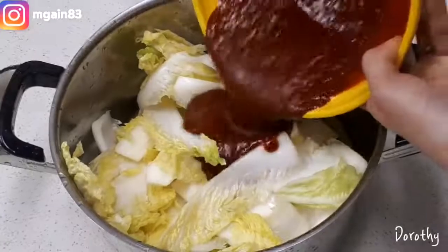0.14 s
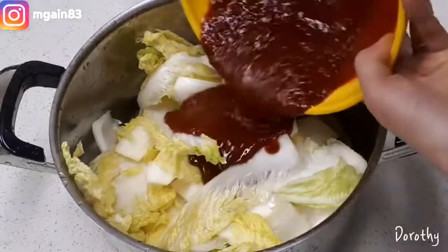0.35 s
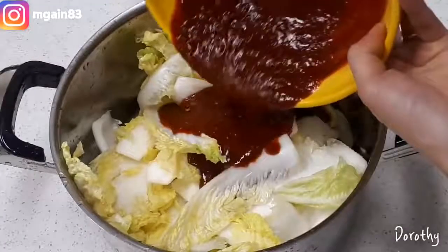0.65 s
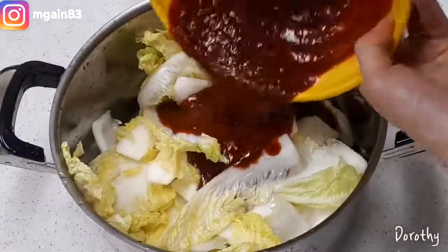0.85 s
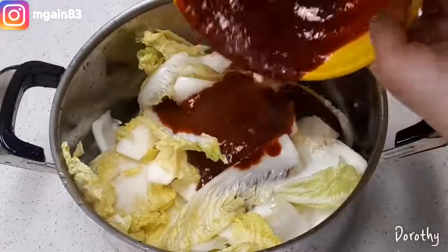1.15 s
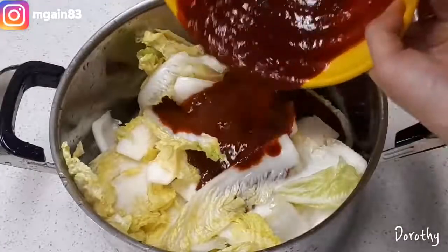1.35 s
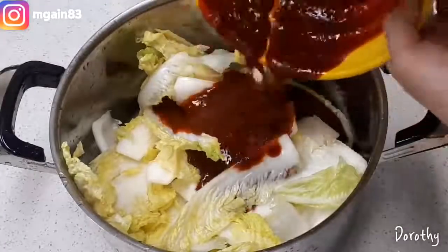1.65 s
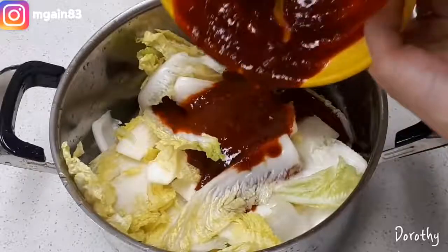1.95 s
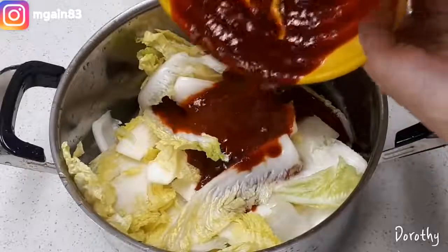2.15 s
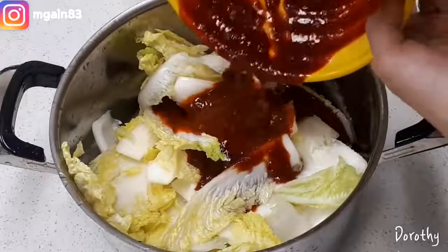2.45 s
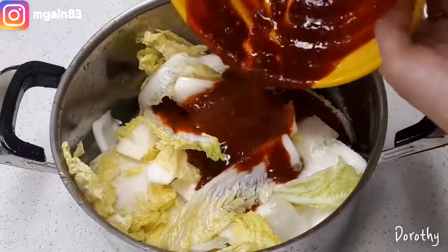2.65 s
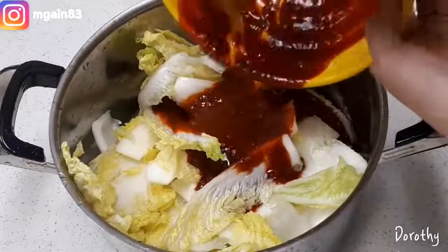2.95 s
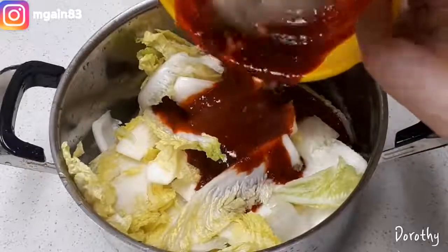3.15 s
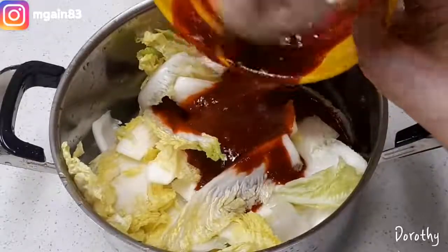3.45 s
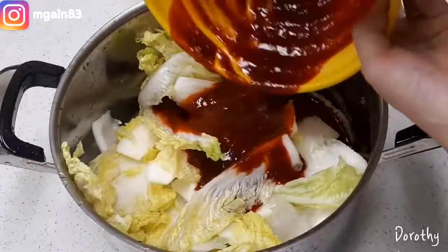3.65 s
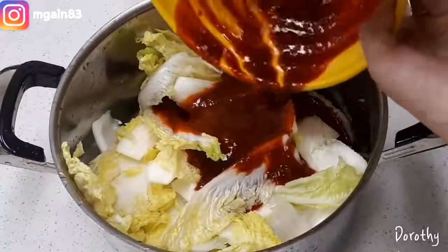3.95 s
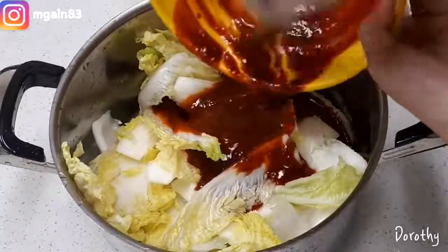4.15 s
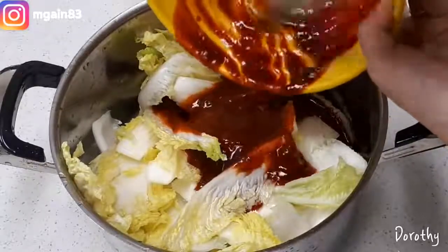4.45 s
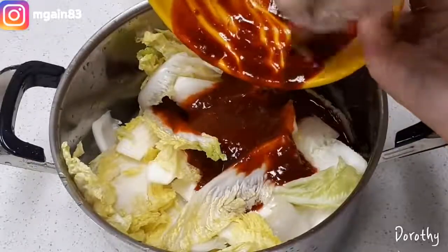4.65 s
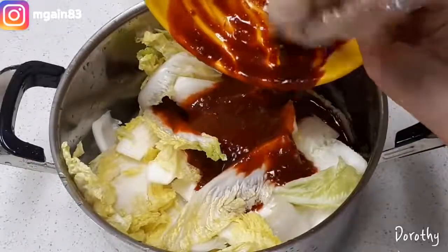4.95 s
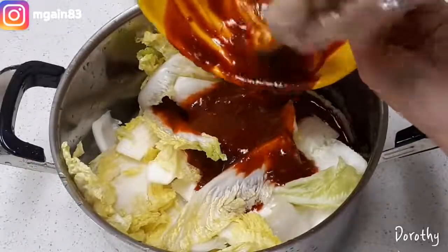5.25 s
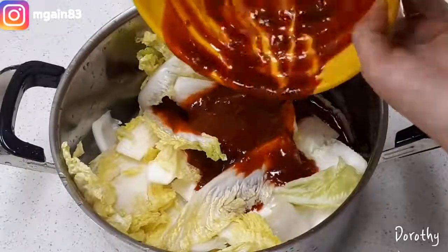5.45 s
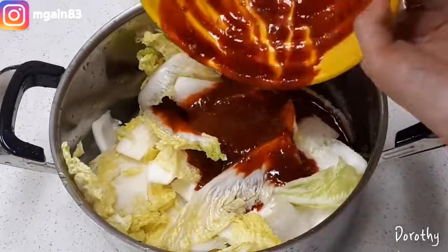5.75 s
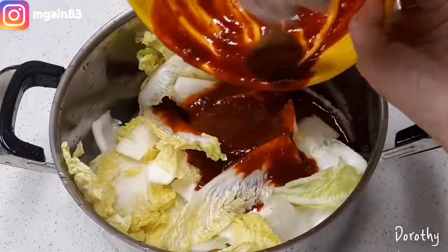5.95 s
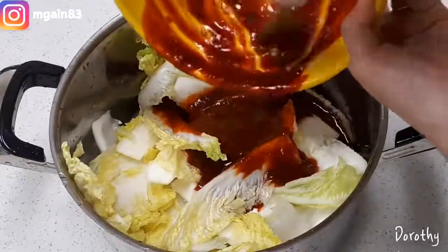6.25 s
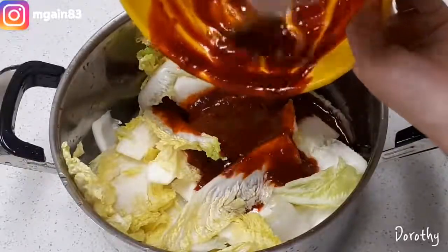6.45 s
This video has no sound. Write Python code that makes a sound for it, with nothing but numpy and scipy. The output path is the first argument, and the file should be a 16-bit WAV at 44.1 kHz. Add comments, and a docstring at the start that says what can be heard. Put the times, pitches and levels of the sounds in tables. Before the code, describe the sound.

Close, dry-ish kitchen sound: soft ventilation with a faint appliance hum, then short wet wipes of sauce under a gloved hand. Plastic bowl knocks are hollow and quickly damped, several in quick pairs mid-way, later spaced about a quarter second apart. Glove film clicks, one bright and much louder early on, and small squirts of trapped air accompany the strokes. Near echoes and a short tail.

```python
"""Gloved hand scraping thick sauce from a plastic bowl.

Strokes squelch: bursting films and bubbles, filtered by shifting pockets between the fingers.
Wet knocks, many of them at the start of a stroke, flex the bowl and ring its modes; air squirts out.
The thin glove snaps in between: short coloured noise clicks.
Kitchen: near echoes and a short diffuse tail, over ventilation noise and a faint appliance hum."""
import sys
import numpy as np
from scipy import signal
from scipy.io import wavfile
from scipy.ndimage import uniform_filter1d

SR = 44100
rng = np.random.default_rng(int(sys.argv[2]) if len(sys.argv) > 2 else 0)


def wav_record(signal):
    """Record a signal, one row per channel, as 16-bit PCM in the file named by sys.argv[1]."""
    frames = np.transpose(np.atleast_2d(signal))
    bounded = np.clip(frames, -1, 1)
    # unit amplitude maps onto the largest positive 16-bit level
    quanta = np.round(bounded * 32767).astype(np.int16)
    wavfile.write(sys.argv[1], SR, quanta)


N = 290619

# ventilation noise spectrum: f/Hz, relative level/dB
AIR_SPECTRUM = [(20, -29), (45, -14), (75, -11), (130, -1), (200, -8.5), (420, -13.5), (600, -14.5),
                (780, -13.5), (1000, -23.5), (2000, -27), (4000, -40), (7800, -31.5), (9000, -40),
                (13000, -39.5)]
# appliance hum partials: f/Hz, rms level/dB before the opening rise
HUM_PARTIALS = [(75, -72.5), (120, -67), (420, -72), (753, -69)]
# kitchen decay: f/Hz, t60/s
KITCHEN_T60 = [(150, 0.86), (500, 0.55), (1400, 0.39), (4000, 0.44), (10000, 0.4)]
# echoes from pot, counter and wall: t/s, gain/1
ECHOES = [(.0021, 0.006), (.0052, 0.18), (.0093, 0.0081), (0.0142, .16), (0.0324, 0.2)]
# side filter, stereo width: f/Hz, gain/dB
WIDTH = [(100, -13.5), (350, -14.5), (700, -9.5), (1400, -5.5), (2800, -7.5), (5500, -1.5), (12000, -4)]
# clearest snaps of glove and popping sauce: t/s, peak level/dB, tilt/(dB/octave)
SNAPS = [(0.124, -33, 14), (.652, -38, 7), (0.787, -33, 12), (0.815, -32, 1.5), (.829, -33.5, 0.5),
         (0.941, -32, -6), (.963, -28, -0.5), (1.0766, -11, 16.5), (1.138, -28.5, 10), (1.379, -34, 6),
         (1.821, -22, 9.5), (1.833, -27, 6), (2.14, -40, 7), (2.235, -36, 6), (3.254, -31, 2),
         (3.566, -33.5, -4.5), (3.649, -34.5, -5), (4.559, -34, -4), (4.932, -45, 1.5), (5.107, -35.5, -2),
         (5.208, -39.5, -7), (5.938, -36.5, -7), (6.024, -31.5, -1), (6.187, -37.5, 0.5),
         (6.229, -38.5, -2.5), (6.26, -30, 8.5), (6.366, -31.5, -1), (6.442, -37, -1.5)]
# snap spectrum: f/Hz, relative level/dB
SNAP_SPECTRUM = [(300, -19), (1200, -9.5), (3200, 4.5), (7500, 6), (9000, -1), (13000, -4)]
# squirts from pockets under the fingers: t/s, level/dB, f/Hz, bandwidth/Hz, decay/s
SQUIRTS = [(0.552, -50.5, 2560, 400, 0.052), (1.035, -51, 3000, 900, 0.046),
           (1.475, -44.5, 3160, 400, 0.023), (1.642, -31.5, 3300, 700, 0.0062),
           (1.674, -34.5, 1410, 1090, 0.014), (1.991, -36, 2970, 4020, .011),
           (2.388, -35, 4300, 1310, 0.008), (2.6, -56.5, 4130, 900, 0.13), (2.712, -41, 2550, 905, 0.042),
           (3.028, -31, 3230, 1820, 0.0096), (4.196, -51, 4100, 900, 0.041), (4.715, -40, 3250, 346, 0.022),
           (4.829, -45, 1210, 890, .008), (5.135, -41, 3190, 400, 0.0042), (5.692, -52.5, 1830, 1000, .025),
           (5.83, -48.5, 3260, 600, 0.048), (6.311, -53.5, 3240, 450, 0.05)]
# knocks of hand and bowl: t/s, blow level/dB, blow f/Hz, smack level/dB,
# ring level re blow/dB (before RING_TRIM_DB)
KNOCKS = [(0.552, -35, 1310, -44.5, -8), (1.4747, -29, 696, -38.5, -5.5), (1.6453, -20.5, 910, -42, -14),
          (1.6726, -32, 1400, -52, -3), (1.9482, -31.5, 710, -38.5, -9.5), (2.221, -27.5, 656, -46, -4.5),
          (2.3657, -22, 1010, -34, -9), (2.3939, -19, 1700, -57, -27), (2.5651, -30, 690, -39, -7),
          (2.7128, -18.5, 1370, -35.5, -18.5), (2.8882, -33, 500, -47.5, -13),
          (3.025, -17, 1350, -32.5, -17.5), (3.2105, -32, 482, -52, -11), (3.3206, -17.5, 1160, -33.5, -12),
          (3.875, -30.5, 595, -42.5, -7), (3.9101, -26.5, 630, -45, -31), (3.935, -31.5, 870, -46.5, -17),
          (4.164, -18, 760, -38, -6.5), (4.438, -17.5, 834, -37.5, -10), (4.714, -17.5, 803, -47.5, -8),
          (5.0027, -19.5, 646, -50.5, -9.5), (5.3456, -23, 704, -49.5, -8), (5.6872, -34, 850, -38.5, -1),
          (6.3102, -25.5, 706, -41, -10)]
# bowl modes: f/Hz, relative level/dB, t60/s
BOWL_MODES = [(245.4, -21, 0.31), (373.5, -14, 0.32), (416.5, -9, 0.047), (544, -61, 0.12),
              (589, -24, 0.085), (615, -2.5, 0.062), (700, -21, 0.6), (747.3, -4.5, 0.05),
              (803.3, -4.5, 0.16), (1020, -41, 0.27), (1170, -48, .16), (1253, -13.5, 0.14),
              (1536, -21.5, 0.16), (1654, -22, 0.15), (2100, -44, 0.13), (3180, -20, 0.29),
              (3210, -6.5, 0.052), (3270, -47, 0.036), (4040, -18, 0.12)]
# wet smack spectrum: f/Hz, relative level/dB
SMACK_SPECTRUM = [(300, 5.5), (1000, 3), (1800, 8), (2600, -5), (3250, 7.5), (3600, -3.5), (4100, 3.5),
                  (5500, 1.5), (7800, -4.5), (8800, -11.5), (13000, -13.5)]
# strokes through the sauce: start t/s, length/s, level halfway/dB (before RUB_TRIM_DB),
# pressure growth over the stroke/dB, tilt/(dB/octave)
STROKES = [(0, 0.22, -71, -7, -4), (0.557, .09, -50.5, -2, -3), (0.75, 0.34, -54.5, 16.5, -2),
           (1.01, 0.32, -49, -1, 1.5), (1.247, .085, -39.5, 3.5, 0), (1.457, 0.21, -50.5, 1, -2),
           (1.602, 0.12, -42, -6.5, 0), (1.748, 0.231, -46, 7, 0), (1.973, 0.079, -41.5, -10, -2),
           (2.283, 0.091, -48, 11, -2.5), (2.6, 0.088, -54, 2, -1), (2.96, 0.049, -44.5, 7, -2),
           (3.108, 0.21, -50.5, 31.5, -2.5), (3.473, 0.12, -46.5, 3, -3), (3.882, 0.053, -43.5, 3, -1.5),
           (4.174, 0.057, -48.5, -1.5, -2), (4.444, 0.077, -44, -1.5, -2.5), (4.718, 0.14, -49.5, -13, -6),
           (4.997, 0.064, -47.5, -8, -3), (5.1, 0.14, -59, -16, -2), (5.353, 0.055, -47.5, 5.5, 0.5),
           (5.711, 0.29, -50, -1, 0), (6.034, 0.053, -42.5, 5, 0.5), (6.315, .11, -54, -6, 2.5),
           (6.464, 0.03, -51.5, 8, 3), (6.572, .03, -39.5, 8, -2)]
# squelch spectrum: f/Hz, relative level/dB
SQUELCH_SPECTRUM = [(100, 13), (220, -8.5), (420, 5.5), (800, 1.5), (1300, -3), (2100, 2), (2600, -4.5),
                    (3200, 1), (4200, 1.5), (5500, -2.5), (7800, -1), (8800, -9), (13000, -8)]

EDGE_HZ = 13150
RING_TRIM_DB, RUB_TRIM_DB = -3, -3
# all strokes grip and release alike; the sound dulls as the glove lifts
GRIP_S, RELEASE_S, DULLING_DB_PER_OCTAVE_S = 0.019, 0.021, 44
# faint steady noise floor under the strokes
FLOOR_DB = -81.5
# share of its pitch a pocket loses as it empties
SAG_SHARE = 0.059
# palm squirt: level re blow at PALM_HZ, rise with blow pitch, resonance
PALM_DB, PALM_DB_PER_OCTAVE = -22.5, 9
PALM_HZ, PALM_WIDTH_HZ, PALM_DECAY_S = 1280, 730, 0.022


def gain_of(db):
    """Decibels to amplitude."""
    return 10 ** (np.asarray(db) / 20)


def evened(x):
    """Scale to unit rms."""
    return x / np.sqrt(np.mean(x ** 2) + 1e-20)


def read(points, f_hz):
    """Interpolate a table over log frequency."""
    table_hz, value = np.transpose(points)
    return np.interp(np.log(f_hz + 1), np.log(table_hz), value)


def add(mix, t_s, sound):
    """Mix a sound in at a time, cut at the end of the mix."""
    part = mix[round(t_s * SR):][:len(sound)]
    part += sound[:len(part)]


def octaves(f_hz):
    """Octaves from 4200 Hz, the tilt pivot; constant below 1200 Hz."""
    return np.log2(np.maximum(f_hz, 1200) / 4200)


def colour(x, points, tilt_db=0, size=2048):
    """Causal minimum-phase filter with the given spectrum and tilt per octave."""
    f_hz = abs(np.fft.fftfreq(size, 1 / SR))
    log_gain = np.log(gain_of(read(points, f_hz) + tilt_db * octaves(f_hz)))
    taps = np.fft.ifft(np.exp(signal.hilbert(log_gain).conj())).real
    return signal.oaconvolve(x, taps[:size // 2])[:len(x)]


def low_cut(x, cut_hz):
    """Second-order high-pass."""
    return signal.sosfilt(signal.butter(2, cut_hz, "high", fs=SR, output="sos"), x)


def burst(t, decay_s):
    """Noise with instant onset and exponential decay."""
    return rng.standard_normal(len(t)) * np.exp(-t / decay_s)


def resonate(x, f_hz, width_hz):
    """Unit-gain one-pole resonance following the curve f_hz, by shift to 0 Hz and back."""
    turn = np.exp(2j * np.pi * np.cumsum(f_hz) / SR)
    r = np.exp(-np.pi * width_hz / SR)
    return 2 * (turn * signal.lfilter([1 - r], [1, -r], x / turn)).real


def background(air_db=-64, waver_rad=1.62, start_db=-5):
    """Ventilation noise and phase-wavering hum; both rise to full level from 0.5 to 1 s."""
    t = np.arange(N) / SR
    mid, side = (evened(colour(rng.standard_normal(N), AIR_SPECTRUM, size=8192)) * gain_of(air_db)
                 for _ in range(2))
    for f_hz, db in HUM_PARTIALS:
        waver = evened(signal.resample(rng.standard_normal(64), N))
        mid += gain_of(db) * np.sqrt(2) * np.sin(2 * np.pi * f_hz * t + waver_rad * waver)
    rise = gain_of(np.interp(t, [.5, 1], [start_db, 0]))
    return np.array([mid, colour(side, WIDTH)]) * rise


def tail(rise_s=0.002, reflections_per_s=4000):
    """Diffuse reflections: sparse noise taps, each band with its own decay; unit energy."""
    taps = rng.standard_normal(SR // 2) * (rng.random(SR // 2) < reflections_per_s / SR)
    f_hz, t, z = signal.stft(taps, SR, nperseg=256)
    decay = gain_of(-60 * t / read(KITCHEN_T60, f_hz)[:, None])
    z = z * decay * (1 - np.exp(-t / rise_s))
    taps = signal.istft(z)[1][:SR // 2]
    return taps / np.linalg.norm(taps)


def paths(room_db=-5, side_room_db=-1, scatter_db=-2, scatter_decay_s=0.0026):
    """Mid/side responses: direct sound, near echoes and room; early scatter in the side, mostly treble."""
    mid = gain_of(room_db) * tail()
    mid[0] += 1
    for t_s, gain in ECHOES:
        mid[round(t_s * SR)] += gain
    scatter = burst(np.arange(len(mid)) / SR, scatter_decay_s)
    scatter *= gain_of(scatter_db) / np.linalg.norm(scatter)
    side = colour(scatter + gain_of(side_room_db) * tail(), WIDTH)
    return np.array([mid, side])


def kitchen(x, count=4, tails_per_s=3.3):
    """Crossfade cyclically between several random tails, for a smooth, even room."""
    place = np.arange(N) / SR * tails_per_s
    out = np.zeros((2, N))
    for k in range(count):
        share = np.maximum(1 - abs((place - k) % count - 1), 0)
        out += signal.oaconvolve((x * share)[None], paths(), axes=1)[:, :N]
    return out


def rubbing(t):
    """Rubbing level/dB and tilt/(dB/octave): strokes grip, press harder or ease off, release."""
    power, tilt_sum = np.full(len(t), gain_of(FLOOR_DB) ** 2), np.zeros(len(t))
    for start_s, length_s, db, growth_db, tilt_db in STROKES:
        age = t - start_s
        lifted = np.maximum(age - length_s, 0)
        growth = growth_db * (np.clip(age / length_s, 0, 1) - .5)
        pressure = gain_of(db + RUB_TRIM_DB + growth)
        stroke = (np.clip(age / GRIP_S, 0, 1) * pressure * np.exp(-lifted / RELEASE_S)) ** 2
        power += stroke
        tilt_sum += stroke * (tilt_db - DULLING_DB_PER_OCTAVE_S * lifted)
    return 10 * np.log10(power), tilt_sum / power


def creases(per_s=9, above_db=12, spread_db=3, max_tilt_db=11, count=200):
    """Lesser snaps at random times, peaks tied to the rubbing level; columns as SNAPS."""
    when, size, bright = rng.random((count, 3))[:int(per_s * N / SR)].T
    t_s = when * N / SR
    peak_db = rubbing(t_s)[0] + above_db + spread_db * (2 * size - 1)
    return list(zip(t_s, peak_db, max_tilt_db * bright))


def snaps(crumple=0.48, click_decay_s=0.00025, crumple_decay_s=0.0029):
    """A glove crease flips over: click plus brief crumple noise."""
    out, t = np.zeros(N), np.arange(SR // 30) / SR
    for t_s, db, tilt_db in SNAPS + creases():
        noise = burst(t, click_decay_s) + crumple * burst(t, crumple_decay_s)
        click = colour(noise, SNAP_SPECTRUM, tilt_db)
        add(out, t_s, gain_of(db) * click / abs(click).max())
    return out


def palm():
    """Each knock squeezes the hollow of the palm, more so if the blow is sharp; columns as SQUIRTS."""
    rows = []
    for t_s, db, f_hz, _, _ in KNOCKS:
        palm_db = db + PALM_DB + PALM_DB_PER_OCTAVE * np.log2(f_hz / PALM_HZ)
        rows.append((t_s, palm_db, PALM_HZ, PALM_WIDTH_HZ, PALM_DECAY_S))
    return rows


def squirts(pops_per_s=900, opening=0.33, low_cut_hz=300):
    """A pocket pops open and air sputters out through a doubled resonance gliding down."""
    out, t = np.zeros(N), np.arange(SR // 4) / SR
    for t_s, db, f_hz, width_hz, decay_s in SQUIRTS + palm():
        fade = np.exp(-t / decay_s)
        pitch_hz = f_hz * (1 - SAG_SHARE * (1 - fade))
        pops = (rng.random(len(t)) < pops_per_s / SR) * rng.standard_normal(len(t))
        drive = fade * (evened(pops) + .5 * rng.standard_normal(len(t)))
        drive[0] += opening * np.linalg.norm(drive)
        squirt = resonate(resonate(drive, pitch_hz, width_hz), pitch_hz, width_hz)
        # energy set by level and decay alone
        squirt *= np.linalg.norm(fade) / np.linalg.norm(squirt)
        add(out, t_s, gain_of(db) * squirt)
    return low_cut(out, low_cut_hz)


def bowl_ring(t, blow_hz, off_pitch_db=-2.0, detune_share=0.0078, rise_s=0.0013):
    """Decaying bowl modes; those near the blow pitch answer most, the changing grip detunes them."""
    ring = np.zeros(len(t))
    for k, (f_hz, mode_db, t60_s) in enumerate(BOWL_MODES):
        size = gain_of(mode_db + off_pitch_db * abs(np.log2(f_hz / blow_hz)) - 60 * t / t60_s)
        mode_hz = f_hz * (1 + detune_share * rng.standard_normal())
        ring += (-1) ** k * size * np.sin(2 * np.pi * mode_hz * t)
    return ring * (1 - np.exp(-t / rise_s))


def knocks(cycles=0.57, spatter=0.51, touch=0.32, touch_s=0.0023, low_cut_hz=70):
    """A soft blow flexes the bowl, sauce smacks under the glove, the bowl rings."""
    out, t = np.zeros(N), np.arange(SR // 3) / SR
    lead_t = t[:SR // 50]
    for t_s, db, f_hz, wet_db, free_db in KNOCKS:
        # wall swings about twice before the hand stops it
        age = t * f_hz / cycles
        blow = -(age * np.exp(1 - age)) ** 2 * np.sin(2 * np.pi * f_hz * t) * gain_of(db)
        smack = colour(burst(t, 0.0021) + spatter * burst(t, 0.0067), SMACK_SPECTRUM)
        # level refers to the first 4 ms
        smack *= gain_of(wet_db) / np.std(smack[:SR // 250])
        ring = bowl_ring(t, f_hz) * gain_of(db + free_db + RING_TRIM_DB)
        add(out, t_s, blow + ring + smack)
        # glove meets sauce just before the hand lands: reversed decay
        lead = evened(colour(rng.standard_normal(len(lead_t)), SMACK_SPECTRUM))
        lead *= np.exp(-lead_t / touch_s)
        add(out, t_s - len(lead) / SR, touch * gain_of(wet_db) * lead[::-1])
    return low_cut(out, low_cut_hz)


def bubbles(per_s=520, cycles=6, spread_db=2.0, count=4000):
    """Air bubbles of many sizes open in the sauce, each ringing a few cycles at rising pitch."""
    out, t = np.zeros(N), np.arange(SR // 60) / SR
    for when, pitch, chance in rng.random((count, 3))[:int(per_s * N / SR)]:
        f_hz = 1100 * 10 ** pitch
        size = f_hz * gain_of(spread_db * min(-np.log(1 - chance), 3))
        ring = np.exp(-t * f_hz / cycles) * np.sin(2 * np.pi * f_hz * t * (1 + 8 * t))
        add(out, when * N / SR, size * ring)
    return evened(out)


def wiping(pops_per_s=2400, spread_db=2.0, smear=0.58, patchy_db=5.5, lumpy_db=1.2,
           low_cut_hz=130, size=512):
    """Sauce films and bubbles burst under the glove; pockets between fingers colour them over time."""
    pop_size = gain_of(spread_db * np.minimum(rng.exponential(1, N), 4))
    pops = (rng.random(N) < pops_per_s / SR) * rng.choice([-1, 1], N) * pop_size
    crackle = evened(pops) + smear * rng.standard_normal(N) + .5 * bubbles()
    f_hz, t, z = signal.stft(crackle, SR, nperseg=size, noverlap=size * 3 // 4)
    rub_db, tilt_db = rubbing(t)
    # random gains smoothed over frequency, then time
    pockets = uniform_filter1d(rng.standard_normal(z.shape), size=3, axis=0)
    pockets = evened(uniform_filter1d(pockets, size=9, axis=1))
    tilt = octaves(f_hz)[:, None] * tilt_db
    shape = gain_of(read(SQUELCH_SPECTRUM, f_hz)[:, None] + tilt + patchy_db * pockets)
    shape /= np.sqrt(np.mean(shape ** 2, axis=0))
    wet = evened(signal.istft(z * shape, nperseg=size, noverlap=size * 3 // 4)[1][:N])
    # high-pass keeps the squelch free of low rumble
    wet = low_cut(wet, low_cut_hz)
    # the glove sticks and slips
    slips = evened(uniform_filter1d(rng.standard_normal(len(t)), size=3))
    return wet * gain_of(np.interp(np.arange(N) / SR, t, rub_db + lumpy_db * slips))


def scene(balance_db=0.25):
    """Work at the bowl in the kitchen, over the background; all a little to the left."""
    work = snaps() + squirts() + knocks() + wiping()
    mid, side = background() + kitchen(work)
    return np.array([(mid + side) * gain_of(balance_db), (mid - side) * gain_of(-balance_db)])


def record(dry):
    """Band limit: linear-phase low-pass at EDGE_HZ."""
    taps = signal.firwin(255, EDGE_HZ, window=("kaiser", 7), fs=SR)
    return signal.oaconvolve(dry, taps[None], "same")


dry = scene()
out = record(dry)
wav_record(out)
```